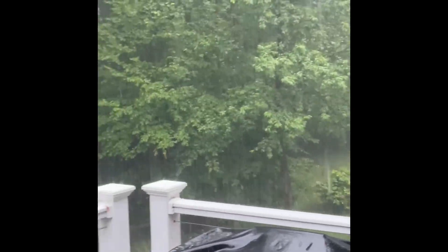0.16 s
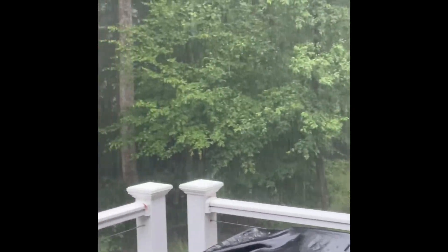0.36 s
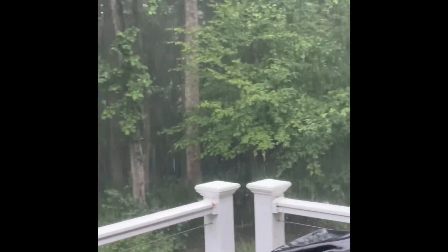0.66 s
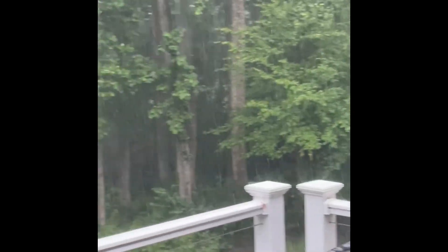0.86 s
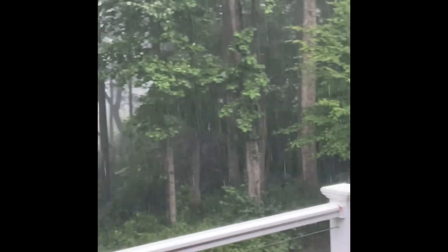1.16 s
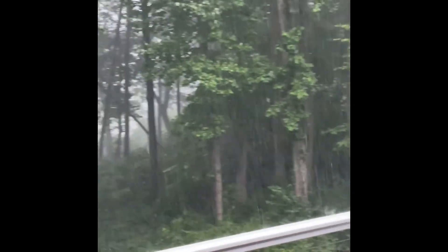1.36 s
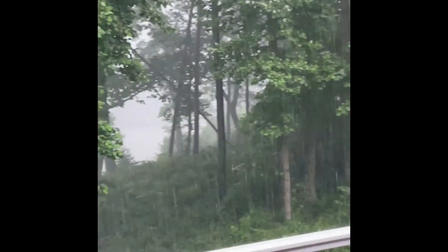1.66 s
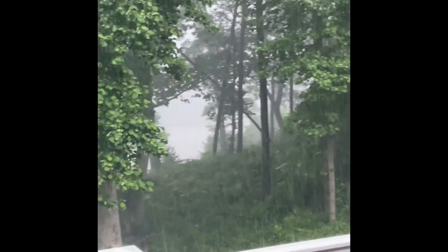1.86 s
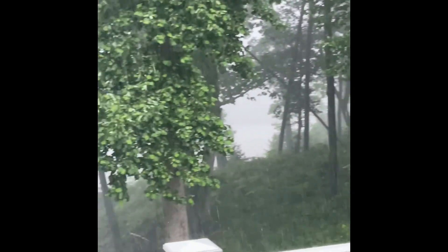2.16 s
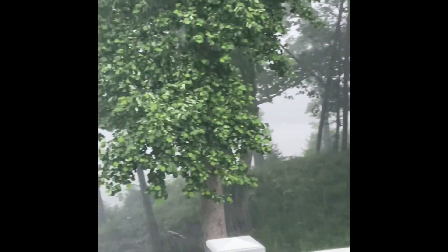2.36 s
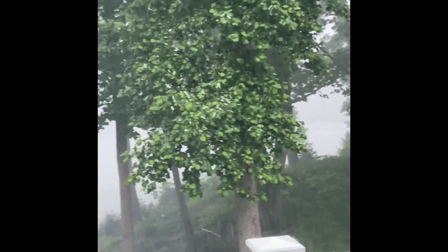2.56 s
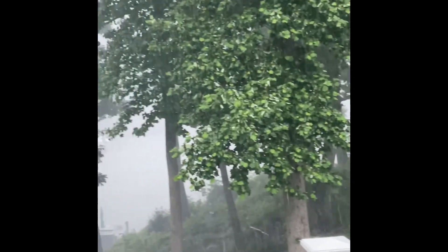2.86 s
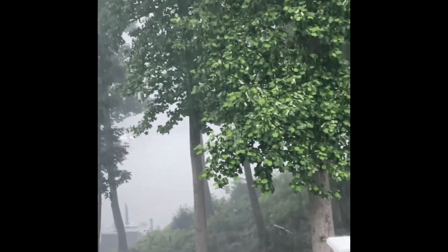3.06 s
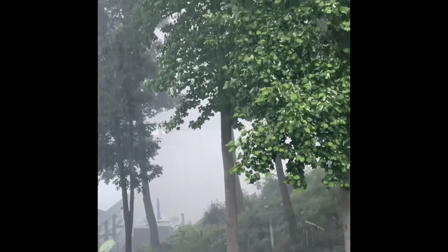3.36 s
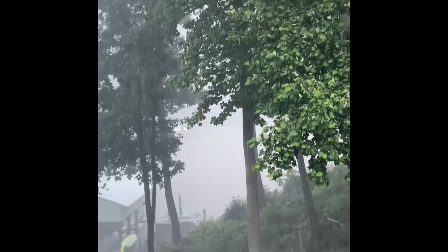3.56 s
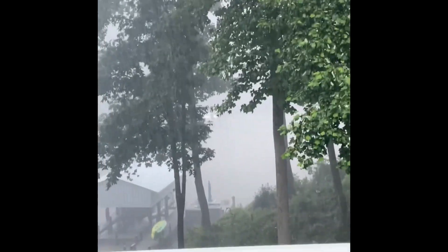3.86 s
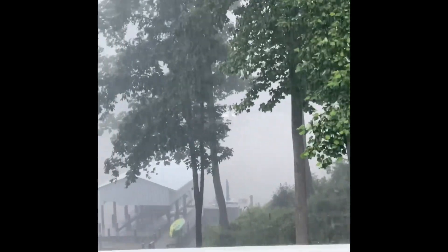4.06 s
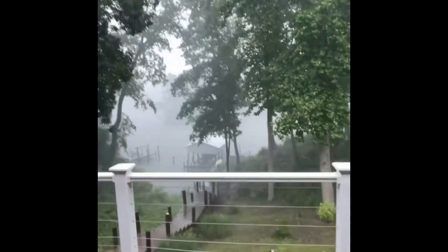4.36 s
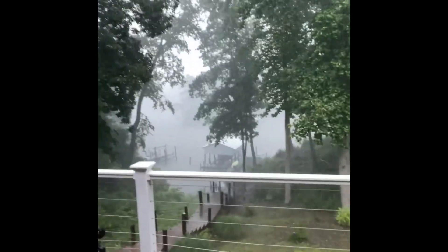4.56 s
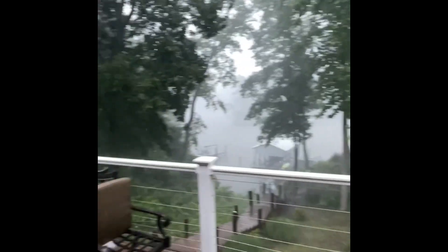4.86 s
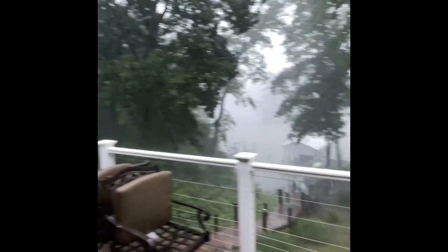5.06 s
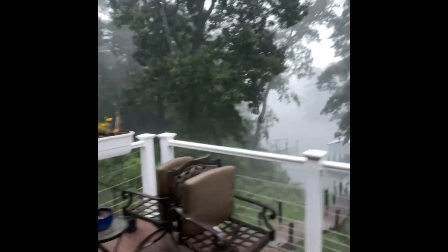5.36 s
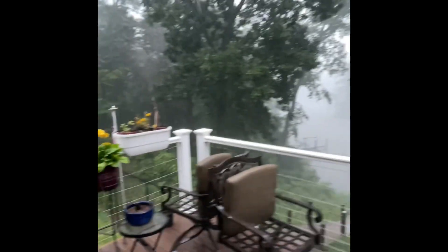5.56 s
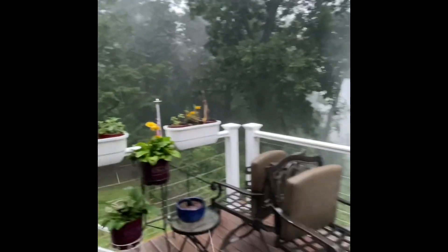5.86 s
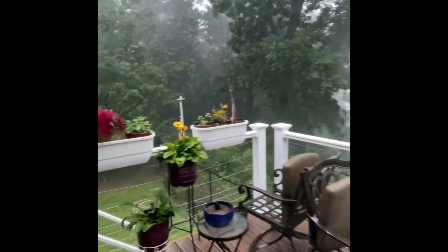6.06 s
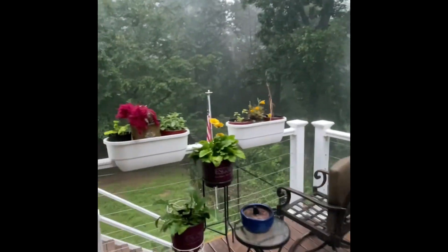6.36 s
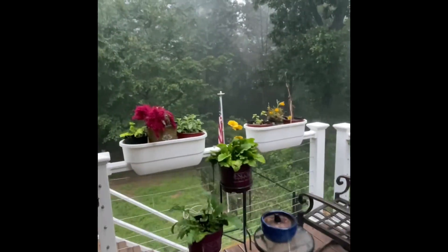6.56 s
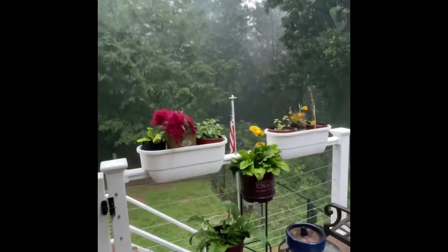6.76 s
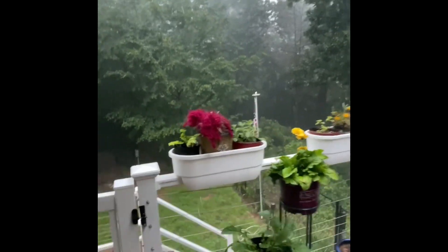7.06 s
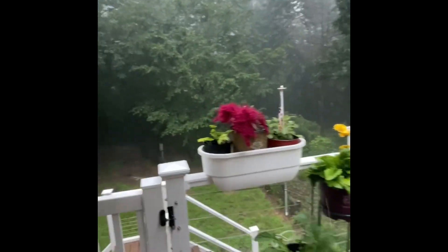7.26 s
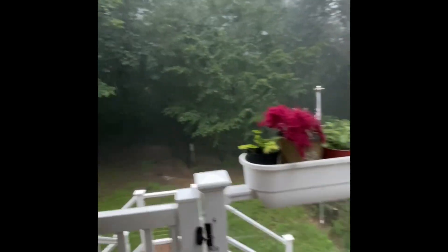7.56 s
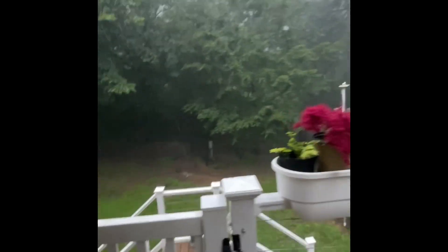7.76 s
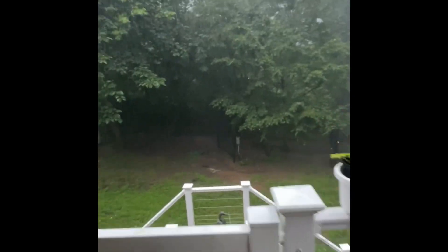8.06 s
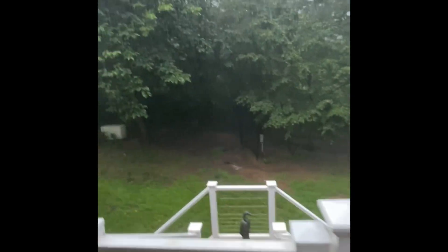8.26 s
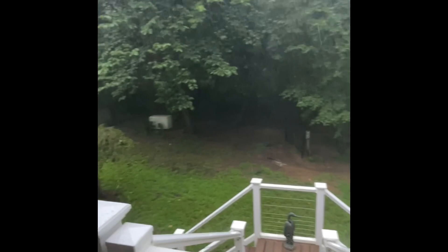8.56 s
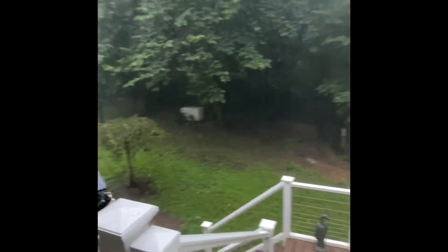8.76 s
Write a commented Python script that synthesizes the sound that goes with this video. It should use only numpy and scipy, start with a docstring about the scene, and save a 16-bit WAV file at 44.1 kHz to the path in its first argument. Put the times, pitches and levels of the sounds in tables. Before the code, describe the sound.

Heavy rain fills the whole nine seconds at a nearly constant level, falling on leaves, lawn and a deck. Countless distant drops blur into a dense, broad roar, strongest in the lows and mids with a softened top, while nearer drops add a fine, uneven, clicking patter. Small splashy clusters flicker at about 0.35 and 1.1 s, with sharper single drops near 1.6 and 1.9 s. At 4.0 s a short, dull low thump sounds, and by 4.3 s the narrow stereo image has opened wide. Crisp close drops snap from 5.1 to 5.8 s, first leaning left, then right. Low, lumpy wind buffets the small handheld microphone faintly from 6.3 to 7.4 s and more from 7.7 to 9 s, with soft thumps. At about 7.8 s distant thunder swells quickly, rolls dully and dies within half a second beneath the continuing rain.

```python
"""Heavy rain on leaves, lawn and a deck, heard by a small handheld pair of microphone ports.
From the start, countless far drops melt into a roar of noise; nearer ones patter as ringing clicks and
a few snap out as short rings with spray. At about 4 s short low thumps begin, as sagging sine swings, and
the pickup, first aimed narrowly ahead, opens out wide. After 6 s, gusts of low noise buffet the ports
twice, and near 8 s thunder rumbles once far off, as dull noise that swells and dies."""
import sys
import numpy as np
from scipy import signal
from scipy.fft import rfft, irfft, next_fast_len
from scipy.io import wavfile

SR = 44100
rng = np.random.default_rng(int(sys.argv[2]) if len(sys.argv) > 2 else 0)


def materialize(psi):
    """Save the field psi as 16-bit PCM at rate SR to the path in sys.argv[1].

    A 1-D psi becomes a single channel; in a 2-D psi each row is a channel.
    """
    bounded = np.clip(np.atleast_2d(psi).T, -1, 1)
    quanta = np.round(bounded * 32767).astype(np.int16)
    wavfile.write(sys.argv[1], SR, quanta)


def invert_db(level):
    """Linear amplitude ratio for a level in decibels (20 dB per decade), elementwise."""
    return 10 ** (np.asarray(level, dtype=float) / 20)


N = 392490  # length in samples, about 8.9 s


def rms_one(x):
    """Scale a sound so that its rms (average strength) is 1."""
    return x / np.sqrt(np.mean(x ** 2) + 1e-20)


def drift(rate_hz):
    """Slow random wandering of rms 1: noise smoothed by two equal low-pass steps at rate_hz."""
    # made at one point per 40 samples, then joined by straight lines
    r = np.exp(-80 * np.pi * rate_hz / SR)
    noise = rng.standard_normal(N // 40 + 2002)
    slow = signal.lfilter([1], [1, -2 * r, r * r], noise)[2000:]  # skip the filter's start-up
    return np.interp(np.arange(N) / 40, np.arange(len(slow)), rms_one(slow))


def band(x, low_hz, high_hz):
    """Keep the part of a sound between two frequencies (Butterworth band-pass)."""
    return signal.sosfilt(signal.butter(2, [low_hz, high_hz], "band", fs=SR, output="sos"), x)


def echoed(x):
    """Deck and wall throw the sound back: delayed, weaker copies join the direct sound."""
    # nearest reflections: delay t/s, level/dB
    reflections = [(.0026, -12), (.0070, -5), (.012, -13)]
    return x + sum(invert_db(db) * np.roll(x, round(s * SR)) for s, db in reflections)


def patter(per_s, spread_db):
    """Random drops of very uneven size, each ringing a few cycles in one of six treble bands; rms 1."""
    sizes = invert_db(spread_db * np.minimum(rng.exponential(1, N), 3.8)) * rng.choice([-1, 1], N)
    # the patter thickens and thins in clumps
    clump_db, clumps_hz = 2.5, 12.0
    drops_per_s = per_s * invert_db(clump_db * drift(clumps_hz))
    lands = rng.random(N) < drops_per_s / SR
    clicks = sizes * lands + 1e-18
    dealt = rng.integers(0, 6, N)  # which band each drop rings in
    pitches_hz = np.geomspace(2200, 12500, 6)
    rings = sum(band(clicks * (dealt == k), hz / 1.41, hz * 1.42) for k, hz in enumerate(pitches_hz))
    return rms_one(echoed(rings))


def downpour():
    """Two unrelated fields of rain: far drops merged into flat noise, with the patter on top."""
    # strength of the downpour: t/s, level/dB
    pour = [(0, .5), (.6, 0), (1.1, 0.46), (1.7, 0), (3.5, -0.25), (4.1, -0.5), (4.7, 0.5), (5.9, -0.27),
            (7.2, 0.05), (7.9, -0.05), (8.9, -0.5)]
    # a cluster of drops falls together and the patter swells: t/s, swell level/dB
    splashes = [(.215, 3), (.35, 8.5), (.88, 2), (1.055, 7), (1.115, 6), (4.757, 8)]
    splash_s = 0.011  # half-width of a swell
    t = np.arange(N) / SR
    pour_db = np.interp(t, *np.transpose(pour))
    rumble_db = 0.46 + 0.7 * drift(1.0)  # the bass wavers slowly
    # the treble takes an extra share of the swing and comes in small waves
    treble_db = 0.37 * pour_db + 0.96 * drift(7.3)
    swell_db = sum(db * np.exp(-((t - s) / splash_s) ** 2) for s, db in splashes)

    far = invert_db(-0.41) * rng.standard_normal((2, N))
    near = invert_db(-9.0 + swell_db) * np.array([patter(800, 3.8), patter(800, 3.4)])
    fields = far + near
    bass = signal.lfilter(*signal.butter(1, 180, fs=SR), fields)
    dull = signal.lfilter(*signal.butter(1, 4000, fs=SR), fields)
    middle, treble = dull - bass, fields - dull
    return invert_db(rumble_db) * bass + invert_db(pour_db) * (middle + invert_db(treble_db) * treble)


def stray_drops():
    """Mostly fainter near drops, with time, size, pitch and side left to chance."""
    count = 22
    level_db, spread_db, pan_spread_db = -26, 2, 3
    low_hz, high_hz = 6000, 12000
    when, pitch = rng.random((count, 2)).T
    size, side = rng.standard_normal((count, 2)).T
    hz = low_hz * (high_hz / low_hz) ** pitch
    return list(zip(when * (N - 400) / SR, level_db + spread_db * size, hz, pan_spread_db * side))


def near_drops():
    """Each snap is a ring of a few cycles with a broad splash of spray around it."""
    # loudest near drops: t/s, peak level of the ring/dB, ring f/Hz, left minus right level/dB
    loud_drops = [(1.1155, -15, 5600, -1), (1.568, -21, 2800, 1), (1.9043, -15, 4600, 0),
                  (4.37, -21, 2800, -3), (5.082, -15.5, 2850, -5), (5.2229, -15.5, 4300, -5),
                  (5.324, -12, 6000, -2), (5.6009, -15, 5600, 5), (5.8413, -18, 6500, 12)]
    out = np.zeros((2, N))
    t = np.arange(400) / SR
    drops = list(loud_drops) + stray_drops()
    noises = rng.standard_normal((len(drops), len(t)))
    for (s, db, hz, pan_db), noise in zip(drops, noises):
        # the ring loses 60 dB in 13 cycles, the spray in 5.3 ms before its filter
        ring = np.sin(2 * np.pi * hz * t) * invert_db(-60 * t * hz / 13) * (1 - np.exp(-t / 0.0001))
        spray = band(noise * invert_db(-60 * t / 0.0053), hz / 1.6, min(hz * 1.47, 16000))
        snap = ring / np.max(np.abs(ring)) + 0.93 * spray
        at = int(s * SR)
        out[:, at:at + len(t)] += invert_db(db + pan_db * np.array([[0.5], [-0.5]])) * snap
    return np.array([echoed(side) for side in out])


def pickup(table, fields, snaps):
    """The right port hears the left one's field later in phase, mixed with a field of its own."""
    size = next_fast_len(N)
    hz, *columns = np.transpose(table)
    # read the table along a logarithmic frequency scale
    at = np.log(np.fft.rfftfreq(size, 1 / SR) + 1)
    level_db, balance_db, alike, lag = [np.interp(at, np.log(hz), c) for c in columns]
    alike = np.clip(alike, 0, 1)
    late = np.exp(-1j * lag)
    shared, own = rfft(fields, size) * invert_db(level_db) * np.sqrt(SR / 2)
    left_snaps, right_snaps = rfft(snaps, size)
    left = left_snaps + shared * invert_db(balance_db / 2)
    right_field = alike * late * shared + np.sqrt(1 - alike ** 2) * own
    right = right_snaps * late + right_field * invert_db(-balance_db / 2)
    return irfft(np.array([left, right]), size)[:, :N]


def thumps():
    """Each thump is a short low swing whose pitch sags as it dies."""
    # t/s, peak level/dB, base f/Hz (the pitch sags from about 0.94 to 0.44 of it), time to fall by 60 dB/s
    low_thumps = [(3.991, -20.5, 134, 0.07), (6.285, -35, 75, .1), (6.655, -35, 90, 0.091),
                  (7.221, -30.5, 90, .1), (7.85, -25.5, 120, .14), (7.955, -31, 115, 0.11),
                  (8.685, -32, 85, .2)]
    out = np.zeros(N)
    t = np.arange(round(0.3 * SR)) / SR
    for s, db, hz, t60 in low_thumps:
        # cycles completed so far; the sag has a time constant of 14 ms
        turns = hz * (0.44 * t + 0.47 * 0.015 * (1 - np.exp(-t / 0.014)))
        swing = np.sin(2 * np.pi * turns) * (1 - np.exp(-t / 0.0077)) ** 2 * invert_db(-60 * t / t60)
        swing = swing / np.max(np.abs(swing))
        part = out[round(s * SR):round(s * SR) + len(t)]
        part += invert_db(db) * swing[:len(part)]  # the end of the scene may cut it short
    return out


def gusts():
    """Lumpy low noise, pushing the two ports mostly against each other; each gust rises, holds and falls."""
    # start t/s, time from start until the fall begins/s, level/dB
    gust_rows = [(6.3, 1.1, -54), (7.72, 1.3, -46.5)]
    rise_s, fall_s = 0.074, 0.07
    t = np.arange(N) / SR
    level = sum(invert_db(db) * np.interp(t, [s, s + rise_s, s + length, s + length + fall_s], [0, 1, 1, 0])
                for s, length, db in gust_rows)
    push, common = band(band(rng.standard_normal((2, N)), 40, 140), 30, 200)
    lumps = level * invert_db(2.4 * drift(8.0))
    opposed = rms_one(push) * np.array([[1], [-1]])
    return lumps * (opposed + 0.46 * rms_one(common))


def thunder():
    """A far roll: dull noise that swells quickly and dies."""
    start_s, rise_s, t60_s = 7.83, 0.04, 0.6  # t60: time to fall by 60 dB
    level_db = -34  # before the swell and the fall shape it
    t = np.maximum(np.arange(N) / SR - start_s, 0)
    roll = rms_one(band(rng.standard_normal(N), 45, 350))
    return roll * (1 - np.exp(-t / rise_s)) * invert_db(level_db - 60 * t / t60_s)


def scene():
    """Rain through the opening pickup, with thumps, wind and thunder below."""
    # how the pickup hears the rain when aimed ahead, then when wide:
    # f/Hz, level/dB, left minus right level/dB, left-right likeness (0 to 1), right lag/radians
    aimed_table = [(25, -75, 0.0, 0.999, -4), (45, -73, 0.0, 0.999, -1.5), (68.5, -62.5, -1, 0.999, -0.9),
                   (98, -66, -0.3, 0.999, -0.02), (125, -63.5, -0.7, 0.997, -0.14),
                   (220, -64.0, -2.5, 0.99, -0.12), (400, -63.5, -2.5, 1, -0.24),
                   (560, -64, -5, 0.83, -0.2), (740, -65, -4, 0.73, 0.14), (1400, -65.5, -0.5, 0.79, 0),
                   (1800, -65.0, 2.6, 0.77, -0.3), (2020, -64, 2, 0.97, 0.24),
                   (2600, -65.5, 0.3, 0.91, 0.92), (3280, -67.5, 0.1, 0.95, 0.57),
                   (4120, -69.5, -0.0, 0.93, 0.46), (4700, -69.0, 0.0, 0.95, 0.2),
                   (5520, -70.5, 0.0, 1, 0.23), (6210, -71.5, -0.2, 0.5, 1.54), (6840, -73, -0.5, 1, 2.5),
                   (8210, -74, -0.0, 1, 3.5), (10500, -76, -0.1, 0.98, 6), (11900, -78.5, 0.0, 0.93, 6.9),
                   (13150, -82, 2, 0.92, 8.5), (14900, -81.5, 0.0, 0.9, 10), (15700, -82, 0.1, 0.97, 10.5)]
    wide_table = [(25, -81, -0.2, 0.96, 2), (45, -69, -1, 0.98, -0.11), (68, -63, 0.1, 0.92, -0.7),
                  (98, -67.5, -1.7, 0.98, -0.16), (125, -62.5, -2.3, 0.99, -0.15),
                  (220, -64.5, -4.2, 0.95, -0.1), (415, -63, -4.5, 0.86, 0.3), (590, -65, -5.5, 0.26, 0.95),
                  (754, -62.0, -2.5, 0.51, 1.2), (1000, -63.5, -0.3, 0.51, 0.8),
                  (1680, -65.5, 1.5, 0.78, -0.2), (1810, -68.5, 1.5, 0.65, -0.5),
                  (2000, -67, 0.5, 0.56, 0.26), (2580, -66.0, -0.5, 0.26, 1.3), (3300, -68, 0, 0.06, 2.3),
                  (4100, -70.5, 0.7, 0.45, 0.54), (4700, -69.5, 0, 0.13, 1.5), (5500, -70, 0, 0.59, 0.94),
                  (6300, -71, 0.1, 0.31, 1.3), (7110, -73, -1.5, 0.86, 3), (8000, -74.5, -0.3, 0.88, 3.5),
                  (10350, -79, -0.5, 0.82, 5.5), (12000, -81.5, 0.1, 1, 7), (13000, -85, -0.3, 0.93, 8.5),
                  (14900, -84, 0.0, 0.89, 10), (15700, -82.5, -0.1, 0.86, 10)]
    opens_s = 4.13, 4.34  # start and end of the fade from aimed to wide
    fields, snaps = downpour(), near_drops()
    wide = np.interp(np.arange(N) / SR, opens_s, [0, 1])
    rain = (1 - wide) * pickup(aimed_table, fields, snaps) + wide * pickup(wide_table, fields, snaps)
    return rain + thumps() + gusts() + thunder()


def low_pass(x):
    """Removes everything above the highest recorded frequency."""
    return signal.sosfilt(signal.butter(12, 16020, fs=SR, output="sos"), x)


def record(dry):
    """The deepest bass, below about 30 Hz, is cut."""
    mix = signal.sosfilt(signal.butter(2, 30, "high", fs=SR, output="sos"), dry)
    return low_pass(mix)


dry = scene()
out = record(dry)
materialize(out)
```